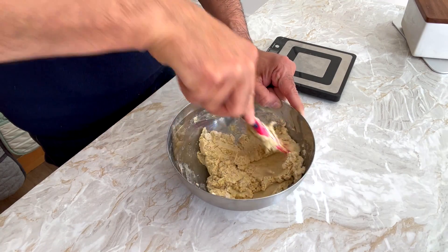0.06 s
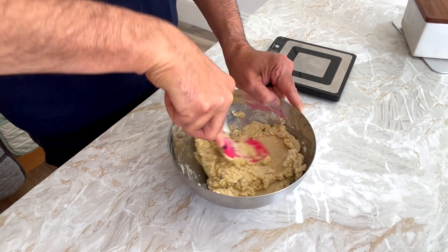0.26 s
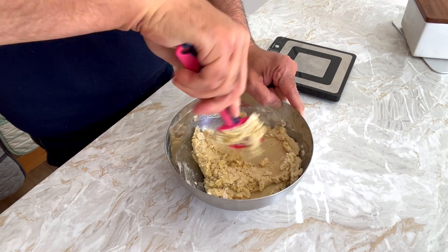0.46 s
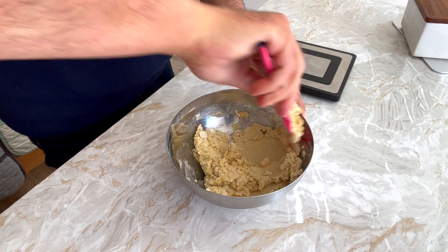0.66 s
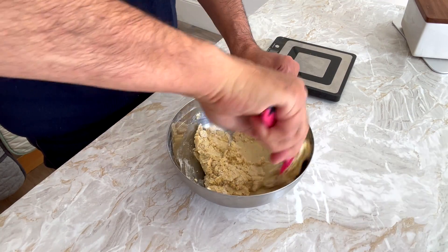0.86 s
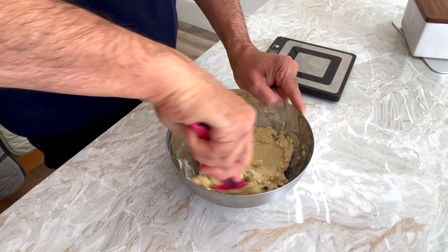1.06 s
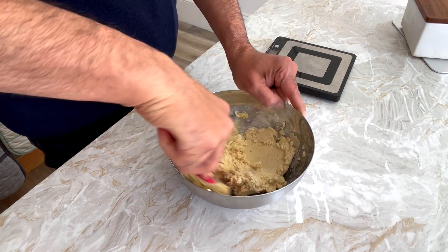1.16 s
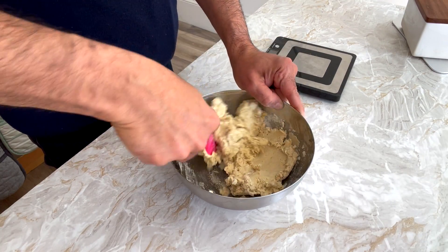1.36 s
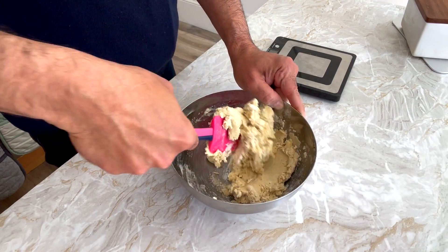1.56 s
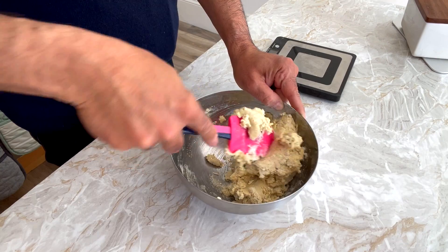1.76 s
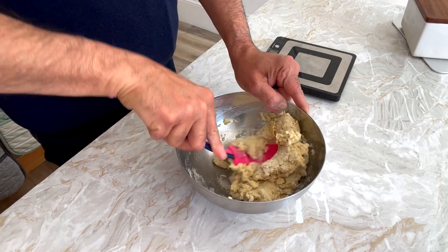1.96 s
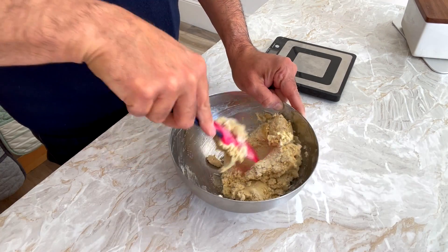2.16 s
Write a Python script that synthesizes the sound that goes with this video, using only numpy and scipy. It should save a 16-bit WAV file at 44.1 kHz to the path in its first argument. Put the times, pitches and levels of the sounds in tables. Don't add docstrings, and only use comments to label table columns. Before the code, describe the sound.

A spatula stirs thick dough in a metal bowl: a brief hiss and sticky ticks, a cluster of soft knocks, then uneven scraping and pushing, heard close in stereo in a quiet kitchen.

```python
import sys
import numpy as np
from scipy import signal
from scipy.fft import rfft, irfft
from scipy.io import wavfile
from scipy.ndimage import uniform_filter1d

SR = 44100
rng = np.random.default_rng(int(sys.argv[2]) if len(sys.argv) > 2 else 0)


def unload_audio(sound):
    columns = np.transpose(np.atleast_2d(sound))
    steps = np.round(np.clip(columns, -1, 1) * 32767)
    wavfile.write(sys.argv[1], SR, steps.astype(np.int16))


def volts_from_db(level):
    exponent = np.asarray(level, float) / 20
    return 10 ** exponent


N = 97020

# time in seconds, blade speed in dB, wall contact in dB,
# push on the bowl in dB, grit in dB.
STROKE = [(0, -95.5, -49, -67.5, -33), (0.082, -90, 7.5, -82, 11.5), (.12, -72, 4.5, -56, -6.5),
          (0.198, -57, -7.5, -56, -9.5), (.3, -66, -1, -42, -11), (0.382, -61.5, -4.5, -52.5, -11),
          (0.458, -67.5, 0.5, -50, -6.5), (0.658, -104, -13, -87, -0.5), (0.718, -67, -13.5, -66.5, -15),
          (0.812, -64.5, 3.5, -56, -4), (1.07, -53.5, 2.5, -44.5, -12.5), (1.218, -53.5, -2, -52.5, -8),
          (1.39, -67.5, -2.5, -69, -5.5), (1.561, -79.5, -20.5, -55, -4.5), (1.77, -74, -11.5, -81, -12),
          (1.908, -65, 8.5, -43.5, 0), (2.0, -72, 7.5, -54.5, -3), (2.088, -64, 3, -46, -6)]
RELEASE_DB_PER_S = 156

# frequency in Hz, density in dB per Hz.
HISS_SPECTRUM = [(5000, -18.5), (6000, -10), (7000, -9), (8300, -2), (9900, 0), (11200, -13), (11900, -20)]
RUB_SPECTRUM = [(500, -0.5), (750, 0), (1000, -6), (1310, 1), (1500, -2.5), (2000, -1.5), (2300, -1.5),
                (2600, -16)]
GRIT_SPECTRUM = [(2000, -11), (2900, 0), (3500, 0), (4700, -2), (6000, -10), (7000, -14)]
GRAINS_PER_S, GRAIN_SPREAD_DB, GRAIN_SHARE = 3000, 0, 0.28
HISS_DB, RUB_DB, GRIT_DB, PUSH_DB = 2.5, 1.5, 7, -1

LUMPS_PER_S, LUMP_SPREAD_DB, LUMP_SOFT_HZ = 900, 2.2, 650

# frequency in Hz, t60 in seconds, level when knocked in dB,
# level when pushed in dB.
BOWL_MODES = [(60.5, 0.42, -11.5, -6), (108.5, 0.14, -8.5, -9.5), (171, 0.14, -45, -30),
              (238.6, 0.087, 10.5, 0.5), (281.8, 0.1, 4, -10.5), (315.8, 0.062, -3, -3.5),
              (382.4, 0.096, -9.5, -11), (512.3, 0.057, -0.5, -7), (584, 0.17, -8.5, -16),
              (663.3, 0.083, -29.5, -6), (757, 0.08, -17, -38), (803, 0.2, -46, -25),
              (1298, 0.17, -45, -17)]

# start in seconds, peak in dB, contact in milliseconds.
KNOCKS = [(0.2262, -36.5, 1), (.229, -27, 1.18), (0.2356, -28, 1.03), (0.2379, -19, 2.1),
          (0.332, -47, 0.76), (.41, -44, 3.2), (0.509, -41.5, 4.6), (.545, -41, 4.97), (0.719, -54.5, 2),
          (0.777, -40.5, 3.5), (0.917, -36, 3.5), (1.142, -58, 1.16), (1.49, -51, 2.7),
          (1.544, -43.5, 2.25), (1.569, -44, 2.6), (1.524, -52, 1.4), (1.885, -39.5, 1.5),
          (1.899, -38.5, 0.83), (2.075, -38.5, 1.45), (2.112, -43, 2.5)]
KNOCK_RISE_S = .001

# start in seconds, peak in dB, pitch in Hz.
SNAPS = [(0.155, -43, 1230), (0.167, -39, 7630), (0.2022, -37.5, 7600), (0.351, -50, 1300),
         (.372, -42.5, 7100), (.226, -46, 1370), (1.204, -34.5, 3700), (1.3775, -44.5, 2300),
         (1.4148, -43.5, 2570), (1.421, -50, 8500), (1.468, -48, 2450), (1.466, -50.5, 7500),
         (1.515, -53, 6330), (1.594, -51, 2600), (1.792, -45, 7600), (1.809, -45, 7460), (1.815, -45, 3600),
         (1.843, -44.5, 6700), (1.912, -38, 2380), (1.911, -40, 7400)]
SNAP_Q, SNAP_S, SNAP_TAIL_DB, SNAP_TAIL_S = .9, .0009, -17, .01

KITCHEN_T60_S, KITCHEN_DB = 0.15, -9.5

# frequency in Hz, density in dB per Hz.
ROOM_SPECTRUM = [(20, 0.5), (65, 12), (105, -5.5), (300, -17.5), (600, -19.5), (3700, -27.5), (6000, -26),
                 (10500, -29)]
ROOM_DB = -64.5

# frequency in Hz, likeness from 0 to 1.
LIKENESS = [(60, .93), (250, .95), (900, .7), (1500, .85), (3000, .4), (5500, .3), (7400, .8), (11000, .8)]
# frequency in Hz, left minus right in dB.
TILT = [(60, .5), (170, -1.5), (350, -2.2), (1320, -2.2), (3700, -1.2), (7500, 0)]
# time in seconds, delay of the left in microseconds.
LEFT_LAG = [(0, 130.7), (.4, 136), (.8, 133.3), (1.08, 122.6), (1.2, 130.3), (1.7, 131), (2.2, 141.5)]
PATCH_DB, LOW_CUT_HZ, TOP_HZ = 1.2, 102, 11340

# frequency in Hz, depth under its partner in dB.
MASKED = [(2000, 20), (2500, 9), (5400, 4.5), (6400, -0.5), (9000, 1.5), (12000, 3.5)]
MASK_WOBBLE_DB = 1.8
SHARP_S = [
    .165,
    1.79,
]


def evened(x):
    return x / np.sqrt(np.mean(x ** 2) + 1e-20)


def read(points, hz):
    f, value = np.transpose(points)
    return np.interp(np.log(hz + 1), np.log(f + 1), value)


def control(order):
    rows, t = np.array(STROKE), np.arange(N) / SR
    level_db = np.interp(t, rows[:, 0], rows[:, order])
    after_s = np.maximum(t - rows[-1, 0], 0)
    return level_db - (order % 2) * RELEASE_DB_PER_S * after_s


def colour(x, points, low_hz):
    hz = np.fft.rfftfreq(N, 1 / SR)
    gain = volts_from_db(read(points, hz)) / (1 + (low_hz / (hz + 1)) ** 4)
    return evened(irfft(rfft(x) * gain, N))


def ring(x, hz, t60):
    r = np.exp(-np.log(1000) / t60 / SR)
    angle = 2 * np.pi * hz / SR
    return signal.lfilter([np.sin(angle)], [1, -2 * r * np.cos(angle), r * r], x)


def grains(per_s, spread_db):
    size = volts_from_db(spread_db * np.minimum(rng.exponential(1, N), 4))
    sign = rng.choice([-1., 1.], N)
    return evened(size * sign * (rng.random(N) < per_s / SR))


def flicker(span_s, depth_db):
    size = round(span_s * SR)
    smooth = uniform_filter1d(uniform_filter1d(rng.standard_normal(N), size), size)
    return volts_from_db(depth_db * evened(smooth))


def floury_noise():
    clicks = grains(GRAINS_PER_S, GRAIN_SPREAD_DB)
    return GRAIN_SHARE * clicks + (1 - GRAIN_SHARE) * rng.standard_normal(N)


def scrape():
    shared, speed_db = flicker(0.016, .8), control(order=1)
    hiss = volts_from_db(HISS_DB + speed_db) * colour(floury_noise(), HISS_SPECTRUM, 3500) * flicker(0.021, 2.3)
    rub_db = RUB_DB + speed_db + control(order=2)
    rub = volts_from_db(rub_db) * colour(floury_noise(), RUB_SPECTRUM, 420) * flicker(0.018, 1.93)
    grit_db = GRIT_DB + speed_db + control(order=4)
    grit = volts_from_db(grit_db) * colour(floury_noise(), GRIT_SPECTRUM, 1400) * flicker(.02, 1.0)
    return shared * (hiss + rub + grit)


def push():
    soft = signal.butter(2, LUMP_SOFT_HZ, fs=SR)
    lumps = signal.lfilter(*soft, grains(LUMPS_PER_S, LUMP_SPREAD_DB)) * flicker(0.01, 0.5)
    ringing = sum(volts_from_db(db) * ring(lumps, hz, t60) for hz, t60, _, db in BOWL_MODES)
    return volts_from_db(PUSH_DB + control(order=3)) * evened(ringing)


def bowl_knocks():
    t = np.arange(SR // 2) / SR
    modes = sum(volts_from_db(db) * ring(t == 0, hz, t60) for hz, t60, db, _ in BOWL_MODES)
    answer = modes * (1 - np.exp(-t / KNOCK_RISE_S))
    blows = np.zeros(N)
    for s, db, ms in KNOCKS:
        pulse = np.hanning(max(round(ms * SR / 1000), 3))
        blows[round(s * SR):][:len(pulse)] += volts_from_db(db) * pulse / pulse.sum()
    return signal.fftconvolve(blows, answer / abs(answer).max())[:N]


def snaps():
    out, t = np.zeros(N), np.arange(2000) / SR
    shape = np.exp(-t / SNAP_S) + volts_from_db(SNAP_TAIL_DB) * np.exp(-t / SNAP_TAIL_S)
    for s, db, hz in SNAPS:
        b, a = signal.iirpeak(min(hz, SR / 3), SNAP_Q, SR)
        puff = rng.standard_normal(len(t)) * shape
        tick = signal.lfilter(b, a, signal.lfilter(b, a, puff))
        out[round(s * SR):][:len(t)] += volts_from_db(db) * tick / abs(tick).max()
    return out


def kitchen(x):
    t = np.arange(SR // 2) / SR
    sign = rng.choice([-1., 1.], len(t))
    present = (rng.random(len(t)) < .05) * (t > .004)
    taps = sign * present * volts_from_db(-60 * t / KITCHEN_T60_S)
    return signal.fftconvolve(x, taps / np.linalg.norm(taps))[:N]


def room_tone():
    return volts_from_db(ROOM_DB) * colour(rng.standard_normal(N), ROOM_SPECTRUM, 30) * flicker(.06, 1.2)


def microphones(x, other):
    hz, t, z = signal.stft(np.array([x, other]), SR, nperseg=512, noverlap=384)
    same = np.clip(read(LIKENESS, hz), 0, 1)[:, None]
    across_hz = uniform_filter1d(rng.standard_normal(z[0].shape), 8, axis=0)
    patches = evened(uniform_filter1d(across_hz, 25, axis=1))
    drift = volts_from_db(PATCH_DB * patches * (hz > 900)[:, None])
    shared = z[0] * np.sqrt((1 + same) / 2) * drift
    unlike = z[1] * np.sqrt((1 - same) / 2) * drift
    lag_s = np.interp(t, *np.transpose(LEFT_LAG)) / 10 ** 6
    half = volts_from_db(read(TILT, hz) / 2)[:, None] * np.exp(-1j * np.pi * hz[:, None] * lag_s)
    pair = np.array([(shared + unlike) * half, (shared - unlike) / half])
    return signal.istft(pair, SR, nperseg=512, noverlap=384)[1][:, :N]


def unmask(x):
    mid_side = np.array([x[0] + x[1], x[0] - x[1]]) / 2
    hz, t, z = signal.stft(mid_side, SR, nperseg=2048, noverlap=1024)
    band = np.arange(len(hz)) // 16
    power = np.add.reduceat(abs(z) ** 2, np.arange(0, len(hz), 16), axis=1)[:, band]
    noise = rng.standard_normal((len(t), 2, band[-1] + 1))
    wobble = evened(uniform_filter1d(noise, size=3, axis=0)).transpose(1, 2, 0)
    margin_db = read(MASKED, hz)[:, None] + MASK_WOBBLE_DB * wobble[:, band]
    sharp = abs(t[:, None] - SHARP_S).min(1) < 512 / SR
    keep = (power * volts_from_db(2 * margin_db) > power[::-1]) | sharp
    mid, side = signal.istft(z * keep, SR, nperseg=2048, noverlap=1024)[1][:, :N]
    return np.array([mid + side, mid - side])


def scene():
    knocks, low_cut = bowl_knocks(), signal.butter(2, LOW_CUT_HZ, "high", fs=SR)
    near = scrape() + push() + knocks + snaps()
    wet = near + volts_from_db(KITCHEN_DB) * kitchen(near)
    other = scrape() + push() + kitchen(knocks) / 2 + snaps()
    return microphones(signal.lfilter(*low_cut, wet) + room_tone(),
                       signal.lfilter(*low_cut, other) + room_tone())


def low_pass(x):
    return signal.sosfilt(signal.butter(12, 12020, fs=SR, output="sos"), x)


def record(dry):
    lowpass = signal.firwin(255, TOP_HZ, window=("kaiser", 8), fs=SR)
    limited = signal.oaconvolve(dry, lowpass[None], "same")
    return low_pass(unmask(limited))


dry = scene()
out = record(dry)
unload_audio(out)
```